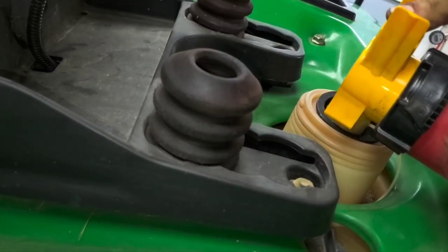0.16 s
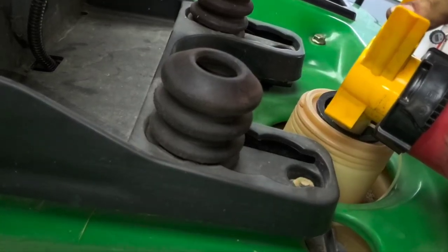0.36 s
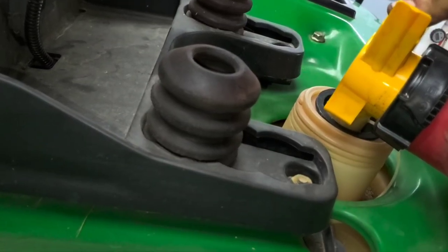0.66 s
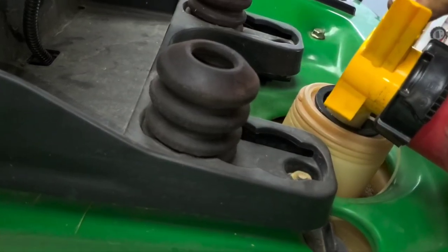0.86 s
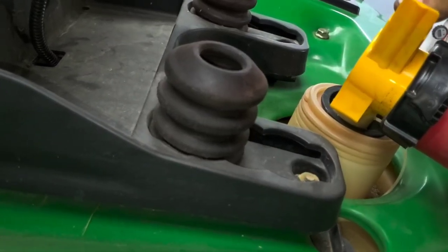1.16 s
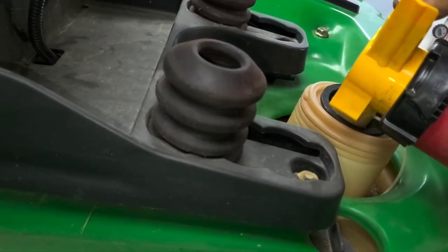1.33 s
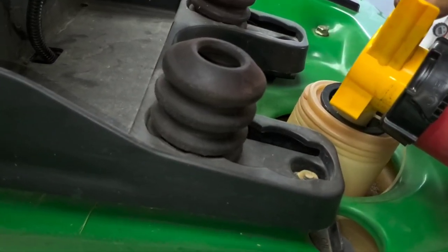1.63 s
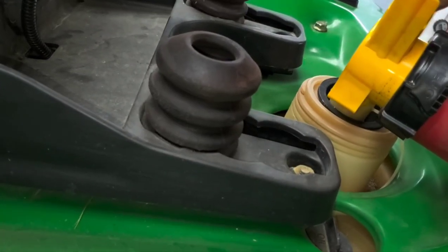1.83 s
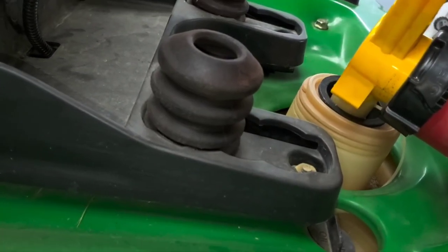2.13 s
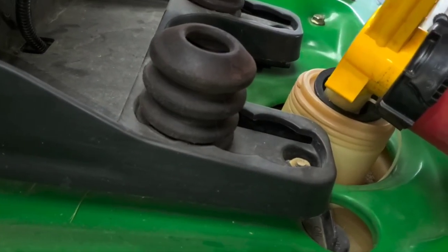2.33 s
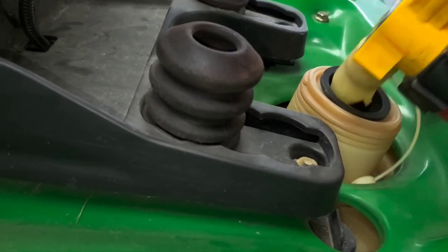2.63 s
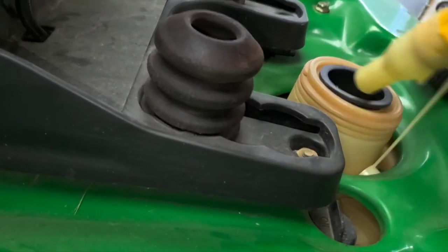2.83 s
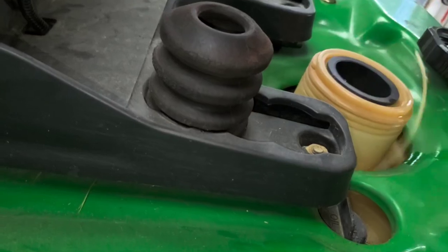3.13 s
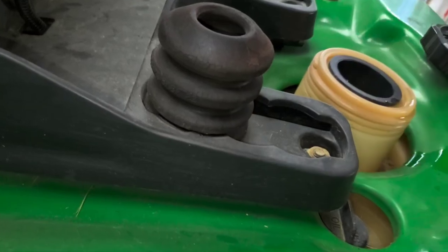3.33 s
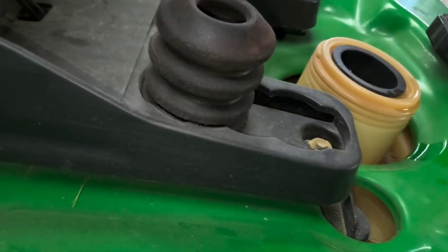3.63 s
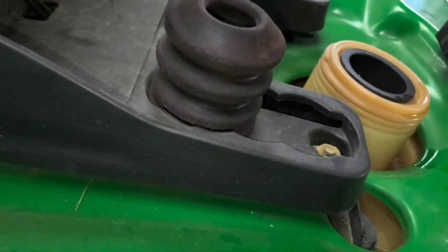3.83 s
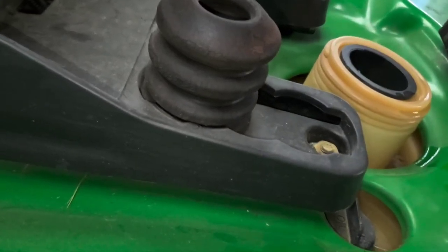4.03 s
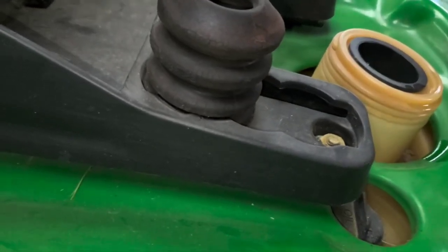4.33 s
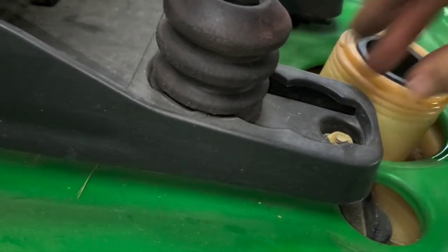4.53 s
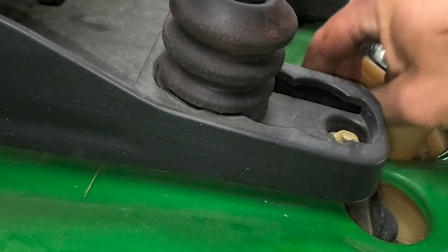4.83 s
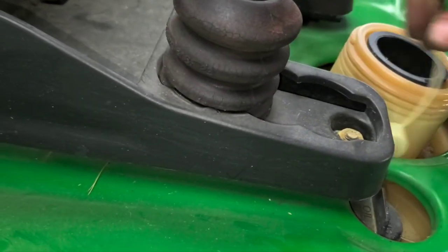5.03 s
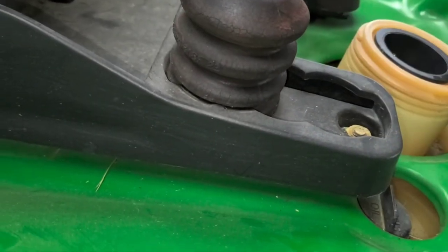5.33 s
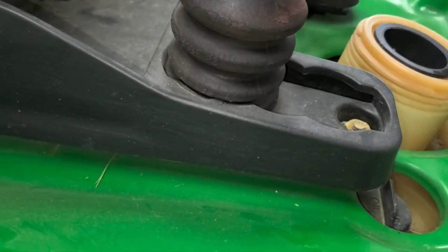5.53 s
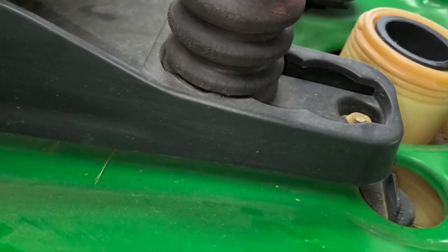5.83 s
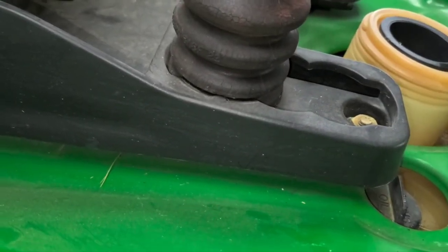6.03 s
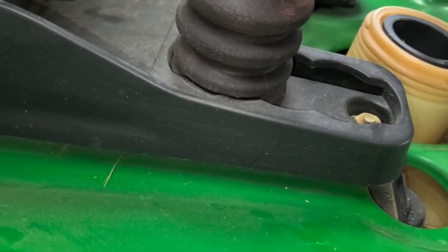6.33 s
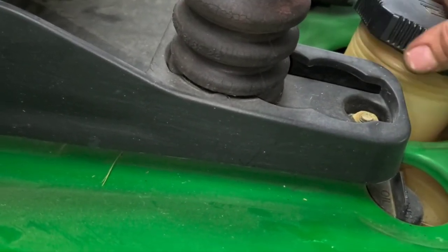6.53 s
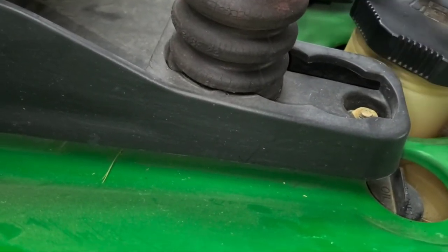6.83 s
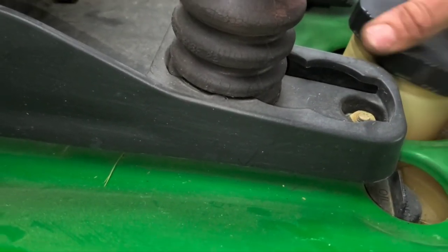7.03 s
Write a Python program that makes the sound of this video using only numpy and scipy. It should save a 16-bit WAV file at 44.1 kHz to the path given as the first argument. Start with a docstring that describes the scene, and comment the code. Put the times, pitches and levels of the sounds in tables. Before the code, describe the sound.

Close up in a quiet workshop, fuel splashes and bubbles into a tank while air gulps back into the plastic can. Sharp knocks and a quick rattle of the spout end the pour, and the can is set down with a hollow, ringing boom. Light rubbing, taps and short squeaks follow as a hand works around the neck, then the plastic cap clicks on. The walls add a soft echo.

```python
"""Petrol fizzes and glugs from a plastic can into a lawn tractor's tank. The jet drags bubbles under
and makes the air in the filler neck hoot, while air gulps back into the can and drops plink.
The spout knocks free and rattles, the stream dies away, and the can lands on the workshop floor
with a boom. A hand then rubs and taps around the neck and fits the plastic cap, which clicks and
squeaks. The walls echo softly over a quiet hush."""
import sys
import numpy as np
from scipy import signal
from scipy.fft import rfft, irfft, next_fast_len
from scipy.io import wavfile
from scipy.ndimage import map_coordinates

SR = 44100
rng = np.random.default_rng(int(sys.argv[2]) if len(sys.argv) > 2 else 0)


def int16_out(signal):
    """Quantize to a 16-bit WAV file."""
    q = np.round(np.clip(np.atleast_2d(signal).T, -1, 1) * 32767)
    wavfile.write(sys.argv[1], SR, q.astype(np.int16))


N = 316638
TIME = np.arange(N) / SR


def amp(db):
    """Turn decibels into a gain."""
    return 10 ** (np.asarray(db) / 20)


def unit(x):
    """Scale a sound to an average (rms) level of 1."""
    return x / np.sqrt(np.mean(x ** 2) + 1e-20)


def along(points, hz):
    """Read between (Hz, value) points on a log frequency axis."""
    freqs, values = np.transpose(points)
    return np.interp(np.log(hz + 1), np.log(freqs), values)


def clock(seconds):
    """The time of each sample in a short sound."""
    return np.arange(int(seconds * SR)) / SR


def wobble(rate):
    """A smooth curve through `rate` random values a second."""
    return map_coordinates(rng.standard_normal(int(N * rate / SR) + 4), [TIME * rate])


def fade(t, t60):
    """Die away by 60 dB in t60 seconds, the 'ring time'."""
    return np.exp(-np.log(1000) * t / np.maximum(t60, 1e-3))


def rise(t, attack):
    """Climb from 0 towards 1; a short attack is a sharp start."""
    return 1 - np.exp(-t / attack)


def add(track, s, sound, pan_db=0):
    """Mix a sound in at second s; pan is left minus right level."""
    start = max(round(s * SR), 0)
    part = track[:, start:start + sound.shape[-1]]
    part += (amp([[pan_db / 2], [-pan_db / 2]]) * sound)[:, :part.shape[1]]


def filtered(x, response):
    """Multiply each frequency of a sound by response(hz)."""
    size = next_fast_len(x.shape[-1] + 8192, True)
    hz = np.fft.rfftfreq(size, 1 / SR)
    return irfft(rfft(x, size) * response(hz), size)[..., :x.shape[-1]]


def coloured(x, spectrum):
    """Shape a sound's tone with (Hz, dB) points."""
    return filtered(x, lambda hz: amp(along(spectrum, hz)))


def soften(x, hz):
    """Roll off the treble above hz, as a soft contact does."""
    return filtered(x, lambda f: 1 / (1 + 1j * np.sqrt(2) * f / hz - (f / hz) ** 2))


def resonate(x, modes):
    """Ring an object's modes: its natural tones, each (Hz, width in Hz, dB)."""
    return filtered(x, lambda f: sum((-1) ** k * amp(db) * 1j * f * width
                                     / (hz * hz - f * f + 1j * f * width)
                                     for k, (hz, width, db) in enumerate(modes)))


def band(x, hz, width):
    """Keep a band around hz; width is a share of hz."""
    mode = [(hz, hz * width, 0)]
    return resonate(resonate(x, mode), mode)


def struck(x, seconds):
    """Scale a blow to a level of about 1 over its first moments."""
    early = fade(np.arange(x.shape[1]) / SR, 10 * seconds)
    return x / np.sqrt(np.sum(x ** 2 * early) / (2 * seconds * SR))


# How alike left and right are. Each row: frequency in Hz, likeness (1 the same, 0 unrelated).
STEREO_LIKENESS = [(60, 0.97), (150, 0.93), (300, 0.82), (650, -0.28), (1300, -0.38), (3000, -0.13),
                   (15000, 0.0097)]


def stereo_angle(hz):
    """Half the phase gap between left and right, in radians."""
    return np.arccos(np.clip(along(STEREO_LIKENESS, hz), -1, 1)) / 2


def noise(size):
    """Stereo white noise: alike in the bass, unrelated in the high treble."""
    mid, side = filtered(rng.standard_normal((2, size)),
                         lambda hz: np.array([np.cos(stereo_angle(hz)), np.sin(stereo_angle(hz))]))
    return np.array([mid + side, mid - side])


def grains(size, rate, spread_db):
    """Tiny random impacts of uneven size, about `rate` a second."""
    hits = rng.random(size) < rate / SR
    strength = amp(spread_db * np.minimum(rng.exponential(size=size), 4))
    return unit(noise(size) * signal.lfilter([1], [1, -.9], hits * strength))


def tail(ring_times, seconds):
    """A wash of noise in which each frequency dies at its own speed."""
    hz, t, spectrum = signal.stft(noise(int(seconds * SR)), SR, nperseg=256)
    return signal.istft(spectrum * fade(t, along(ring_times, hz)[:, None]), SR, nperseg=256)[1]


def ring(hz, t60, attack, glide=0):
    """A dying tone whose pitch climbs by the share `glide`."""
    t = clock(np.clip(t60, .05, 1.5))
    apart = stereo_angle(hz) * rng.choice([-1, 1])
    phase = 2 * np.pi * hz * np.cumsum(1 + glide * (1 - fade(t, t60))) / SR
    shape = fade(t, t60) * rise(t, attack)
    return shape / shape.max() * np.sin(phase + np.array([[apart], [-apart]]))


def contact(t, ring_s):
    """A sharp first touch, then a dying chatter of tiny rebounds."""
    touch = 1.54 * fade(t, 0.0067) * rise(t, 0.00052)
    chatter = amp(3 * map_coordinates(rng.standard_normal(200), [t * 330])) * rise(t, 0.0023)
    return noise(len(t)) * (touch + fade(t, ring_s) * chatter)


# The quiet workshop. Each row: frequency in Hz, relative level in dB.
HUSH_TONE = [(15, -39.5), (27, -20), (42, -7), (97, -5), (161, -19.5), (242, -12.5), (277, -7.5),
             (344, -18), (463, -15), (503, -21), (1290, -29), (1790, -25.5), (3920, -41.5), (16000, -59)]


def hush():
    """The room's low, faint noise wavers slightly."""
    return amp(-50 + 0.56 * wobble(6.6)) * unit(coloured(noise(N), HUSH_TONE))


# The workshop's echo. Each row: frequency in Hz, ring time in seconds.
ECHO_TIMES = [(100, 0.8), (400, 0.26), (3000, 0.25), (7000, 0.21), (14000, 0.37)]


def wall_echo(x):
    """The walls answer, a little differently every half second."""
    out, size = np.zeros((2, N)), SR // 2
    for start in range(0, N, size):
        echo = tail(ECHO_TIMES, seconds=.6)
        echo /= np.linalg.norm(echo[0])
        add(out, start / SR + .008, signal.fftconvolve(x[:, start:start + size], echo, axes=1))
    return soften(out, hz=8000)


# The can lands, then rocks on its hard edges. Each row: start in seconds, level in dB, treble limit in Hz.
FLOOR_HITS = [(3.969, -15, 8000), (4.003, -21, 19000), (4.032, -21.5, 16950), (4.055, -25, 13940),
              (4.213, -37.5, 7530)]
# The room's boom. Each row: frequency in Hz, relative level in dB.
BOOM_TONE = [(25, -16), (76, -5.5), (170, -10), (250, -10), (320, -15.5), (363, -14.5), (450, -13.5),
             (1100, -17), (1400, -23.5), (2800, -24.5), (4000, -35.5), (5500, -37.5), (7400, -39),
             (9500, -52.5), (16000, -42.5)]
# How long it lasts. Each row: frequency in Hz, ring time in seconds.
BOOM_TIMES = [(60, 1.5), (130, 0.95), (250, 0.66), (700, 0.57), (3000, 0.39), (7000, 0.43), (12000, 0.1626)]
# The can's panels. Each row: pitch in Hz, relative level in dB, ring time in seconds.
PANEL_TONES = [(76.1, 2, 2.08), (121.8, -7, 2.5), (198.4, 5.5, 0.47), (256.4, 2.5, 0.52),
               (353.5, -0.5, 0.62), (446, -4.5, 0.22), (539, -3, 0.74), (604, -10, 0.36), (767, -9, 0.43),
               (1080, -4, 0.24), (1093, -3.5, 0.4), (1307, -7, 0.6), (1430, -14, 0.79)]
# Its base flexes under the weight.
# Each row: start in seconds, pitch in Hz, level in dB, ring time in seconds.
BASE_TONES = [(3.963, 58, -18.5, 0.16), (3.965, 150, -15.5, 0.064), (3.97, 269.5, -6, 0.065),
              (4.01, 249, -16, 0.17), (4.036, 366.6, -17.5, 0.21)]


def can_landing():
    """The can meets the floor: the room booms and the can's panels ring on."""
    out = np.zeros((2, N))
    for s, db, top_hz in FLOOR_HITS:
        boom = soften(coloured(tail(BOOM_TIMES, seconds=2.7), BOOM_TONE), top_hz)
        t = np.arange(boom.shape[1]) / SR
        add(out, s, amp(db) * struck(boom, 0.028) * rise(t, 0.00088))
    for hz, db, t60 in PANEL_TONES:
        add(out, FLOOR_HITS[0][0], amp(db - 25) * ring(hz, t60, attack=0.0022))
    for s, hz, db, t60 in BASE_TONES:
        add(out, s, amp(db) * ring(hz, t60, attack=0.0038))
    return out


# Fingers hold the neck, then the cap. Each row: start and end in seconds, level in dB.
FINGER_GRIPS = [(4.743, 4.814, -56.5), (4.992, 5.268, -52.5), (5.855, 6.138, -60), (6.219, 6.257, -57.5),
                (6.304, 6.733, -55.5), (6.768, 6.79, -54.5), (6.987, 7.187, -51.5)]


def finger_rustle():
    """Skin drags on ribbed plastic: a faint, bright patter while the fingers hold on."""
    attack_s, release_s = 0.015, 0.29
    pressure = np.zeros(N)
    for start, end, db in FINGER_GRIPS:
        grip = np.clip((TIME - start) / attack_s, 0, 1)
        pressure += amp(db) * grip * fade(np.maximum(TIME - end, 0), release_s)
    friction = grains(N, rate=1500, spread_db=-0.5) + 1.3 * noise(N)
    patter = coloured(friction, [(1000, 3), (3000, 4.5), (7000, -1.5), (9000, -7.5), (15000, -3)])
    return pressure * amp(2 * wobble(110)) * unit(patter)


# Ribs catch under the fingers. Each row: start in seconds, relative level in dB, pitch in Hz.
RIB_TICKS = [(5.107, -41, 3300), (6.04, -55, 6840), (6.097, -53, 7930), (6.223, -48, 5500),
             (6.311, -49, 4500), (6.379, -41, 5000), (6.683, -50.5, 4000), (6.724, -47.5, 2600),
             (6.774, -46, 4500), (6.853, -41.5, 1900), (6.873, -44, 3500)]


def rib_ticks():
    """Each catch of the ribbed plastic is a small, muffled tick."""
    out, t = np.zeros((2, N)), clock(.09)
    for s, db, hz in RIB_TICKS:
        catch = noise(len(t)) * fade(t, 0.067) * rise(t, .0012)
        tick = soften(band(catch, hz, width=1), hz * 1.1)
        add(out, s, amp(db - 6) * struck(tick, 0.0046))
    return out


# The small plastic parts. Each row: pitch in Hz, width in Hz, relative level in dB.
PART_MODES = [(1830, 116, 1.5), (2232, 37, 10.5), (3010, 770, 0.5), (3440, 110, 6), (4830, 120, 2.5)]


def ring_parts(x):
    """A sound together with the ringing it starts in the small parts."""
    return x + resonate(x, PART_MODES)


# The rows at 6.387 and 6.391 s make a short, rough swell of noise leading into the cap's loud click.
# The others are plastic sticking and slipping under the hand.
# Each row: start and length in seconds, level in dB, pitch in Hz.
ROUGH_SWELLS = [(3.951, 0.029, -32.5, 1506), (4.418, 0.054, -63.5, 7490), (4.939, 0.026, -39, 1900),
                (4.754, 0.054, -47, 3284), (5.023, 0.062, -29, 1770), (5.045, 0.24, -43, 2950),
                (5.216, 0.072, -31.5, 2860), (6.029, 0.11, -47.5, 676), (6.206, 0.26, -53.5, 940),
                (6.391, 0.037, -28, 4350), (6.387, 0.1, -29, 1230), (6.414, 0.069, -25, 496),
                (6.642, 0.095, -55, 1030)]


def rough_swells():
    """Dense, tiny clicks blur into a rough noise that swells and fades."""
    out = np.zeros((2, N))
    for s, length, db, hz in ROUGH_SWELLS:
        t = clock(length)
        clicks = grains(N // 8, rate=2500, spread_db=2.5)[:, :len(t)]
        rough = soften(band(ring_parts(clicks), hz, width=1), min(hz * 3, 7000))
        add(out, s, amp(db) * unit(rough) * np.sin(np.pi * t / length))
    return out


# Plastic slips. Each row: start in seconds, pitch in Hz, level in dB, ring time in seconds.
SLIP_CHIRPS = [(4.777, 5950, -39.5, 0.057), (4.966, 6230, -22, 0.04), (5.162, 3510, -22.5, 0.0131),
               (5.163, 4870, -28, 0.014), (5.932, 4850, -46.5, 0.35), (6.527, 4930, -30.5, 0.32)]


def slip_chirps():
    """A quick slip gives a short, rough squeak: a narrow band of noise."""
    out, t = np.zeros((2, N)), clock(0.095)
    for s, hz, db, t60 in SLIP_CHIRPS:
        slip = noise(len(t)) * fade(t, t60)
        add(out, s, amp(db) * struck(band(slip, hz, width=0.2), 0.005))
    return out


# Plastic sings under the fingers. Each row: start and length in seconds, level in dB, pitch in Hz.
FINGER_SQUEAKS = [(4.78, 0.021, -48, 3130), (5.038, 0.11, -37, 3080), (5.223, 0.029, -28.5, 3770),
                  (5.235, 0.048, -47, 5270), (6.055, 0.13, -40, 325.6)]


def squeaks():
    """Sticking and slipping lock on to one mode of the plastic: a rough, wandering tone."""
    out = np.zeros((2, N))
    pitch_wander, rough_db = .055, 1
    for s, length, db, hz in FINGER_SQUEAKS:
        t = clock(length)
        phase = 2 * np.pi * hz * np.cumsum(1 + pitch_wander * wobble(414)[:len(t)]) / SR
        level = amp(db + rough_db * wobble(250)[:len(t)]) * np.sin(np.pi * t / length)
        apart = stereo_angle(hz)
        add(out, s, level * np.sin(phase + np.array([[apart], [-apart]])))
    return out


# The cap chinks as it is picked up. Each row: start in seconds, level in dB.
CAP_TAPS = [(5.829, -24.5), (5.833, -24.5)]
# The cap's tones. Each row: pitch in Hz, width in Hz, relative level in dB.
CAP_MODES = [(1710, 180, 4), (2150, 230, -2.5), (2750, 170, -4.5), (4700, 200, -1), (5070, 200, -4.5)]


def cap_clinks():
    """A very short tap rings the cap's few modes."""
    out, t = np.zeros((2, N)), clock(0.066)
    for s, db in CAP_TAPS:
        tap = noise(len(t)) * fade(t, 0.0056)
        add(out, s, amp(db) * struck(resonate(tap, CAP_MODES), 0.0059))
    return out


# The loose spout rattles as the can swings away. Each row: start in seconds, level in dB.
SPOUT_HITS = [(3.1905, -18), (3.1945, -15.5), (3.198, -9.5), (3.2122, -17), (3.244, -22.5), (3.2488, -26.5),
              (3.269, -32.5), (3.3005, -29), (3.3228, -41.5)]
# The spout's tones. Each row: pitch in Hz, width in Hz, relative level in dB.
SPOUT_MODES = [(913, 90, -6), (1414, 440, -10.5), (2174, 270, 1), (3080, 360, -2), (4570, 990, -9.5)]


def spout_rattle():
    """Separate sharp hits ring the spout's short-lived modes."""
    out, t = np.zeros((2, N)), clock(.05)
    for s, db in SPOUT_HITS:
        hit = noise(len(t)) * fade(t, 0.0057)
        clack = soften(resonate(hit, SPOUT_MODES), hz=4800)
        add(out, s, amp(db) * struck(clack, .0016), pan_db=1.5)
    return out


# Single tones of the tank, its wall and the spout.
# Each row: start in seconds, pitch in Hz, level in dB, ring time in seconds, pan in dB.
KNOCK_TONES = [(2.362, 830, -20.5, 0.07, 5), (2.362, 1108, -12, 0.021, 11.5),
               (2.363, 1340, -19.5, 0.023, 6.5), (2.364, 533, -24.5, 0.44, -4),
               (2.368, 141.7, -15, 0.19, -5), (2.369, 220.5, -20.5, 0.23, -1.5),
               (2.372, 92.4, -20.5, 0.19, -3.5), (2.743, 3096, -29.5, 0.016, -3.5),
               (2.852, 1153, -37.5, 0.063, -2), (2.922, 990, -30, .055, -3),
               (2.922, 3360, -27, 0.021, -3.5), (2.925, 103.8, -31, .15, -1.5),
               (2.993, 3270, -8, 0.021, -6), (2.996, 369, -20.5, 0.22, 0), (2.997, 439, -24.5, 0.18, -1),
               (3.003, 836, -28, .11, -7.5), (3.199, 261, -22.5, 0.11, -6.5), (3.2, 433, -25, 0.13, -0.5),
               (3.205, 72.7, -30, 0.26, -3.5), (4.738, 807, -29, 0.039, -3), (6.414, 1870, -17.5, .033, -2),
               (6.426, 1074, -22, .08, 0), (6.427, 329, -27, 0.39, -5), (6.572, 134, -19, 0.053, 3),
               (6.574, 256, -19.5, 0.087, -3), (6.547, 717, -22.5, 0.029, -2),
               (6.977, 760, -25, 0.044, -13)]


def after_ring():
    """Single modes ring on after hard knocks; low ones take longer to build."""
    out = np.zeros((2, N))
    for s, hz, db, t60, pan_db in KNOCK_TONES:
        add(out, s, amp(db) * ring(hz, t60, attack=1.28 / hz), pan_db)
    return out


# Plastic knocks on plastic. Each row: start in seconds, relative level in dB, weight in dB (more thump,
# less clack), edge in dB (more crack), clack pitch in Hz, clack ring time in seconds.
PLASTIC_KNOCKS = [(2.355, -25, -8.5, 0, 3240, 0.073), (2.362, -17, -2.5, 2, 1106, 0.021),
                  (2.577, -51, 12.5, -6.5, 2500, .03), (2.758, -36, 6, 7, 4530, 0.017),
                  (2.839, -46.5, -10.5, 13, 2960, 0.0218), (2.919, -35.5, -5.5, -3, 3300, .04),
                  (2.994, -24, -4, -13, 3340, 0.04), (3.019, -27.5, 0.5, -1, 3560, .025),
                  (3.085, -40, 2.5, -8.5, 3430, .03), (3.19, -21, -9, -0.5, 3250, 0.015),
                  (3.198, -22, -8, 1.5, 2293, 0.11), (3.223, -26.5, 6, -0.5, 2320, 0.031),
                  (3.469, -38, -3.5, -27.5, 1230, 0.068), (3.945, -36.5, -1, -4, 1820, 0.24),
                  (4.737, -37, 2.5, -12, 2530, 0.075), (4.773, -33.5, -10, 0.5, 3050, 0.13),
                  (4.803, -32, -14.5, -19, 2660, 0.023), (4.942, -43.5, -13, -7.5, 2260, 0.12),
                  (4.964, -25, -14.5, 0, 2623, 0.1), (5.009, -25.5, -11.5, -3.5, 2850, 0.091),
                  (5.163, -37, -20, 10, 3583, 0.05), (5.215, -34, -12.5, -24, 2900, 0.13),
                  (5.828, -49.5, -21.5, 19.5, 1780, 0.12), (5.932, -38, -6.5, -11.5, 2400, 0.041),
                  (5.943, -32.5, -13.5, -14.5, 2100, 0.05), (6.223, -40, -5, -25.5, 4300, 0.3),
                  (6.413, -22.5, -13.5, 9, 2020, 0.072), (6.435, -30.5, -14, 2.5, 2700, 0.2),
                  (6.547, -22.5, -3, -2.5, 2220, 0.041), (6.567, -25, 4, -19, 1620, 0.026),
                  (6.657, -49, 17.5, -25, 1580, 0.13), (6.681, -38, 2, -16, 2820, 0.11),
                  (6.716, -41.5, 4, -17, 1300, 0.056), (6.875, -35.5, 1, -23.5, 1840, 0.026),
                  (6.975, -23.5, -4, -9, 1500, 0.024), (7.135, -40, 9, -9, 1200, 0.13)]
# The hollow tank and its stiff wall. Each row: pitch in Hz, width in Hz, relative level in dB.
TANK_MODES = [(90, 15, 0.5), (153.4, 31, -5), (203, 30.5, -2.5), (298, 75, -2), (396.5, 40, -2),
              (520, 3.6, -8)]
WALL_MODES = [(423, 200, 0), (743, 145, 10), (1010, 740, 3), (1365, 180, -18)]
# A knock's bright crack. Each row: frequency in Hz, relative level in dB.
CRACK_TONE = [(2000, -21.5), (4500, -10.5), (6500, -4.5), (9000, -11), (12000, -8), (15500, -8.5)]
# Hard spout, soft fingers, then cap. Each row: start in seconds, the crack's treble limit in Hz.
HARDNESS = [(0, 17200), (3.6, 8150), (5.5, 12400)]


def knocks():
    """A contact cracks, clacks a small part, knocks the wall and, more slowly, thumps the tank."""
    out, t = np.zeros((2, N)), clock(0.49)
    for s, db, weight_db, edge_db, hz, ring_s in PLASTIC_KNOCKS:
        push = noise(len(t)) * fade(t, 0.24) * rise(t, 0.0018)
        thump = soften(resonate(push, TANK_MODES), hz=670)
        wall = soften(resonate(contact(t, ring_s * 2.32), WALL_MODES), hz=2556)
        clack = soften(band(ring_parts(contact(t, ring_s)), hz, width=1), hz * 1.5)
        crack = struck(coloured(contact(t, ring_s * 1.08), CRACK_TONE), 0.017)
        top_hz = [top for start, top in HARDNESS if start <= s][-1]
        add(out, s, amp(db + weight_db - 3.5) * struck(thump, 0.014), pan_db=-1.5)
        add(out, s, amp(db - 2) * struck(wall, 0.0083), pan_db=1)
        add(out, s, amp(db - weight_db - 10) * struck(clack, 0.0087))
        add(out, s, amp(db + edge_db - 7.5) * soften(crack, top_hz), pan_db=3.5)
    return out


# The clearest drops. Each row: start in seconds, pitch in Hz, level in dB.
DROPS = [(0.049, 1800, -38.5), (0.053, 2950, -42), (0.095, 640, -32), (0.2, 1920, -35), (0.332, 950, -29),
         (0.414, 1880, -40), (0.452, 2230, -41), (0.471, 2950, -43), (0.515, 2530, -34.5),
         (0.582, 2880, -41.5), (0.603, 2890, -38), (0.804, 1850, -42), (0.83, 980, -33.5),
         (0.905, 2440, -44), (1.006, 1800, -34), (1.119, 1690, -41), (1.354, 2890, -34.5),
         (1.662, 1250, -39), (1.7, 2160, -37), (1.833, 963, -30), (2.127, 1260, -36.5),
         (2.225, 1780, -35.5), (2.282, 785, -28), (2.341, 2050, -30)]


def drips():
    """Drops trap small bubbles that plink; higher ones die sooner."""
    out = np.zeros((2, N))
    for s, hz, db in DROPS:
        t60 = 0.034 * (1000 / hz) ** 0.29
        add(out, s, amp(db) * ring(hz, t60, attack=0.00071, glide=0.04), pan_db=-3)
    return out


# Spray hits the rim. Each row: start in seconds, level in dB, pitch in Hz.
RIM_SPITS = [(0.079, -53, 11000), (0.171, -50, 12060), (0.284, -56.5, 10980), (0.334, -51.5, 8960),
             (0.393, -47, 10900), (0.656, -49, 5500), (0.803, -53.5, 9040), (0.852, -49.5, 5950),
             (1.068, -50.5, 7360), (1.212, -58, 8900), (1.339, -47, 11000), (1.609, -52, 7440),
             (1.679, -44, 5860), (1.832, -50, 9920), (2.026, -50, 6990), (2.227, -49, 6460)]


def spatter():
    """Droplets burst on the rim in short, bright spits."""
    out, t = np.zeros((2, N)), clock(0.081)
    for s, db, hz in RIM_SPITS:
        spit = band(contact(t, ring_s=.04), hz, width=0.9)
        add(out, s, amp(db) * struck(spit, 0.0026), pan_db=3.5)
    return out


BUBBLE_RISE = 0.068  # share by which a small bubble's pitch climbs
# The jet slaps the fuel. Each row: start in seconds, relative level in dB.
JET_SLAPS = [(0.014, -44.5), (0.125, -51), (0.165, -49), (0.25, -51.5), (0.335, -47.5), (0.45, -45.5),
             (0.67, -51), (0.705, -53), (0.905, -50), (1.122, -44), (1.205, -49), (1.372, -48), (1.48, -48),
             (1.79, -46.5), (1.831, -46)]


def jet_slaps():
    """Each slap throws up a tight cluster of tiny ringing bubbles."""
    out, burst_s = np.zeros((2, N)), .024
    for s, db in JET_SLAPS:
        burst = np.zeros((2, SR // 8))
        for when, high, quiet in rng.random((14, 3)):
            hz = 1050 * 3 ** high
            blip = ring(hz, t60=22 / hz, attack=0.00029, glide=BUBBLE_RISE)
            add(burst, when * burst_s, amp(-9 * quiet) * blip)
        add(out, s, amp(db - 3.5) * struck(burst, burst_s))
    return out


LIFT_S, STOP_S = 2.33, 3.44  # the can is raised; the stream breaks off
# The air in the filler neck. Each row: pitch in Hz, width in Hz, relative level in dB.
NECK_MODES = [(846.6, 13, 6.5), (960, 49, -8), (1853, 62, -17.5), (2951, 19, -12), (6180, 51, -37.5),
              (7250, 560, -21.5)]
# Surges of fuel. Each row: time of the crest in seconds, relative level in dB.
FUEL_SURGES = [(0.02, -40), (0.147, -42), (0.209, -41), (0.284, -38), (0.335, -39.5), (0.424, -51),
               (0.503, -40), (0.698, -37.5), (0.779, -38), (0.814, -43), (0.902, -33), (1.015, -38.5),
               (1.098, -39), (1.172, -45), (1.259, -35.5), (1.307, -47), (1.345, -40.5), (1.499, -42),
               (1.551, -44), (1.607, -34.5), (1.72, -43), (1.83, -40.5), (1.865, -35.5), (2.137, -38),
               (2.227, -44), (2.82, -41)]


def neck_hoots():
    """The neck's air rings faintly under the jet; each surge swells it in a short, wavering throb."""
    fed = np.interp(TIME, [LIFT_S - .25, LIFT_S], [1, 0])
    faint_ring = amp(-54.5 + 5 * np.tanh(wobble(35))) * unit(resonate(noise(N), NECK_MODES))
    tinkle = amp(-58.5 + 7 * np.tanh(wobble(45))) * unit(resonate(noise(N), NECK_MODES[2:4]))
    out, t = fed * (faint_ring + tinkle), clock(.12)
    width_s, flutter_db = 0.015, 3
    swell = np.exp(-((t - t.mean()) / width_s) ** 2 / 2)
    for s, db in FUEL_SURGES:
        flutter, waver = [map_coordinates(rng.standard_normal(40), [t * 110]) for _ in range(2)]
        hz = NECK_MODES[0][0] * (1 + .012 * rng.standard_normal() + .013 * waver)
        throb = swell * np.sin(2 * np.pi * np.cumsum(hz) / SR)
        add(out, s - t.mean(), amp(db - 1.5 + flutter_db * flutter) * throb, pan_db=1)
    return out


# The loud gulps of air. Each row: start in seconds, level in dB, pitch in Hz that the gulp rises through.
BIG_GULPS = [(0.009, -28, 212), (0.152, -27.5, 271), (0.339, -31, 282), (0.509, -35, 248),
             (0.538, -37, 310), (0.602, -22.5, 271), (0.665, -32, 302), (0.77, -29.5, 286),
             (0.829, -31.5, 324), (0.962, -25.5, 304), (1.008, -28, 292), (1.352, -35, 188),
             (1.927, -35, 287), (2.228, -31, 298), (2.284, -24, 280)]


def glugs():
    """Air enters the can in big bubbles, each a rising note with a wet snap; small gulps come between."""
    out, t = np.zeros((2, N)), clock(0.12)
    gulps_per_s, snap_db = 6.3, -18
    small_gulps = [((k + .5 + 0.21 * late) / gulps_per_s, -37 + 1.5 * loud, 274.6 * 2 ** (0.11 * high))
                   for k, (late, loud, high) in enumerate(rng.standard_normal((20, 3)))]
    for s, db, hz in BIG_GULPS + small_gulps:
        bubble = ring(hz * 0.902, t60=0.036, attack=0.0077, glide=0.16)
        snap = band(noise(len(t)) * fade(t, 0.063), hz=1700, width=1.9)
        add(out, s - .003, amp(db) * bubble, pan_db=-2)
        add(out, s, amp(db + snap_db) * struck(snap, 0.0016))
    return out


def bubbles(count):
    """The jet drags small bubbles under; each is a short, rising blip that rings the neck."""
    out, pour_s, neck_db = np.zeros((2, N)), 3.3, 20
    for when, high, loud, side in rng.random((count, 4)):
        hz = 600 * 5.5 ** high
        blip = ring(hz, t60=30 / hz, attack=.0006, glide=BUBBLE_RISE)
        add(out, when * pour_s, amp(12 * loud ** 2 - 4 * high) * blip, pan_db=8 * (side - .5))
    neck = amp(neck_db) * resonate(out, NECK_MODES[1:])
    return unit(out + neck) * np.sqrt(pour_s * SR / N)  # level 1 while it pours


# The fizzing spray. Each row: frequency in Hz, relative level in dB.
SPRAY_TONE = [(260, -41), (450, -23.5), (771, 0), (843, 15.5), (908, -6), (1170, -19), (1580, -29.5),
              (1890, -15.5), (2330, -25), (2910, -20.5), (3990, -30), (6930, -23.5), (8290, -38.5),
              (14600, -30.5), (16000, -33.5)]


def spray():
    """Splashing fuel makes a fluttering hiss full of tiny impacts."""
    flutter = amp(1.5 * wobble(70) + 1.3 * wobble(22))
    hiss = noise(N) + 0.59 * soften(grains(N, rate=400, spread_db=4), hz=5030)
    fizz = coloured(hiss, SPRAY_TONE)
    pan = [(2400, -2), (4400, 0.5), (8000, 8), (15000, -1)]  # Hz, left minus right in dB
    fizz = filtered(fizz, lambda hz: amp(np.array([[.5], [-.5]]) * along(pan, hz)))
    # Turn down the neck's main note, which sounds mostly in surges.
    fizz = filtered(fizz, lambda hz: 1 - 0.94 * np.exp(-((hz - 850) / 200) ** 2))
    return flutter * unit(fizz)


# The low churning in the tank. Each row: frequency in Hz, relative level in dB.
CHURN_TONE = [(24, -37.5), (40, -28), (102, -5.5), (158, -3), (195, -1), (294, -7.5), (495, -14.5),
              (600, -35), (780, -49), (1320, -120)]


def fuel_stream():
    """Fuel splashes and churns; the churning eases as the tank fills, the splash as the can lifts."""
    thin_db_per_s, ease_db_per_s, stop_db_per_s = 2, 2.5, 75
    splash_level = amp(-50.5 - thin_db_per_s * np.maximum(TIME - LIFT_S, 0))
    splash = splash_level * (spray() + amp(-2) * bubbles(count=520))
    churn_level = amp(-43.5 - ease_db_per_s * TIME + 1.9 * wobble(22))
    churn = churn_level * unit(coloured(noise(N), CHURN_TONE)) * amp([[-1.5], [1.5]])
    running = amp(-stop_db_per_s * np.maximum(TIME - STOP_S, 0))
    return running * (splash + churn)


def scene():
    """Pouring and handling close by, the can farther off, over the room's hush."""
    pour = fuel_stream() + glugs() + neck_hoots() + jet_slaps() + spatter()
    taps = knocks() + spout_rattle() + rib_ticks()
    ringing = after_ring()
    swells = rough_swells()
    chirps = slip_chirps() + cap_clinks() + squeaks()
    fuel = pour + drips()
    echo = wall_echo(amp(-11.5) * fuel + amp(-9.5) * taps + amp(-15) * ringing
                     + amp(-24.5) * swells + amp(-10) * chirps)
    return fuel + taps + ringing + swells + chirps + finger_rustle() + can_landing() + echo + hush()


def record(dry):
    """Cut away the very highest treble."""
    return filtered(dry, lambda hz: hz < 16100)


dry = scene()
out = record(dry)
int16_out(out)
```